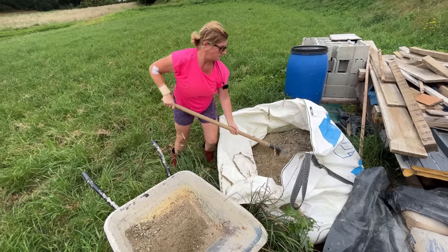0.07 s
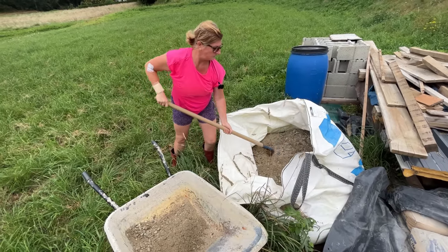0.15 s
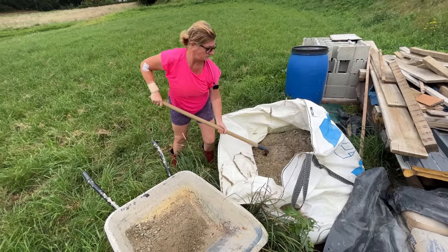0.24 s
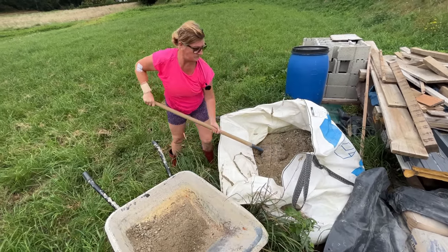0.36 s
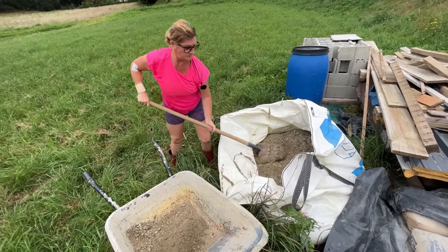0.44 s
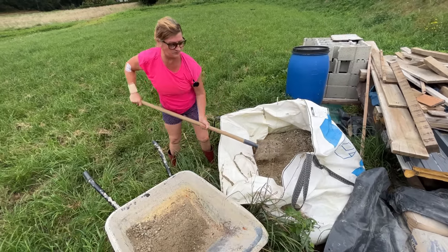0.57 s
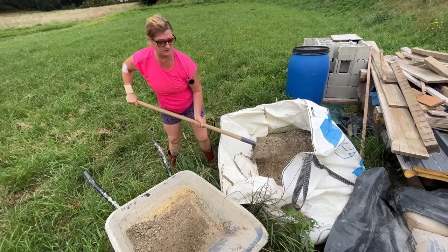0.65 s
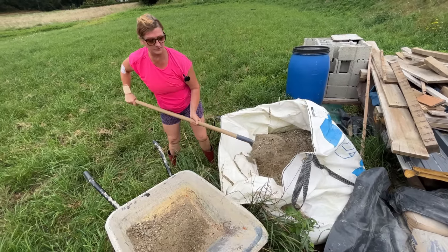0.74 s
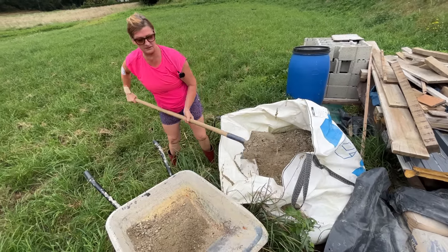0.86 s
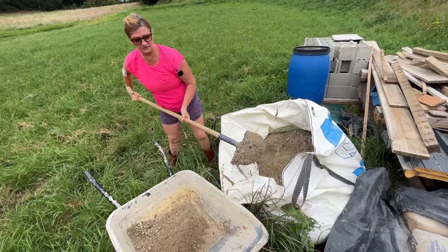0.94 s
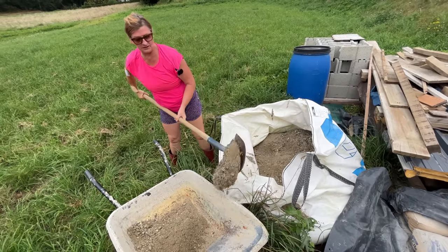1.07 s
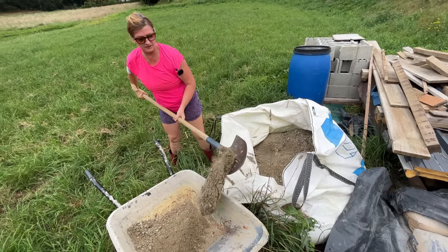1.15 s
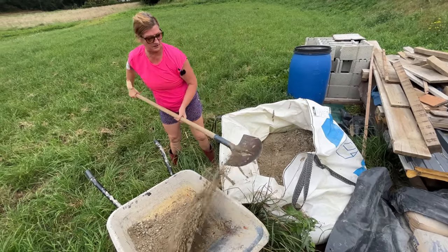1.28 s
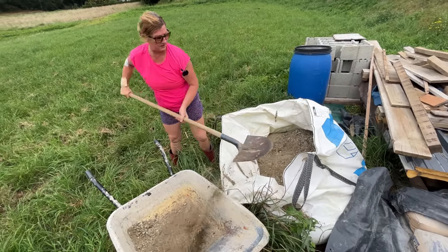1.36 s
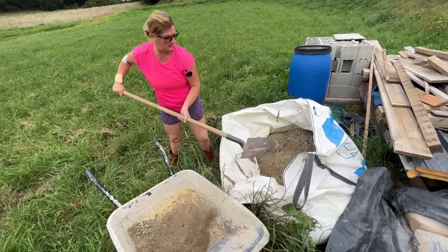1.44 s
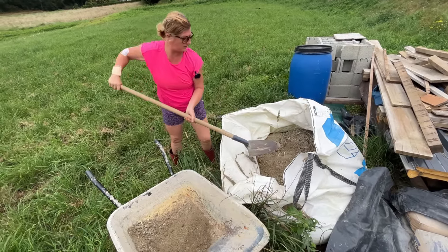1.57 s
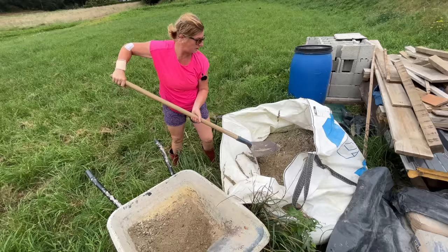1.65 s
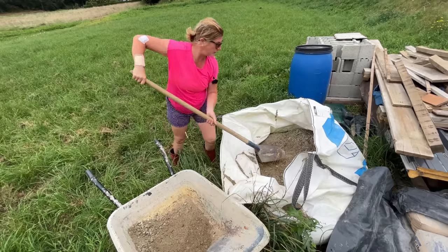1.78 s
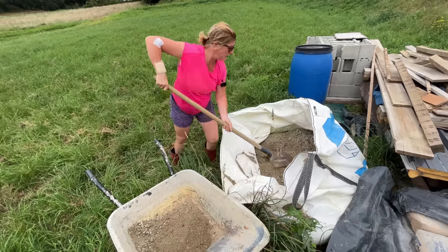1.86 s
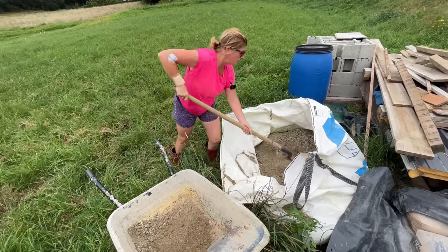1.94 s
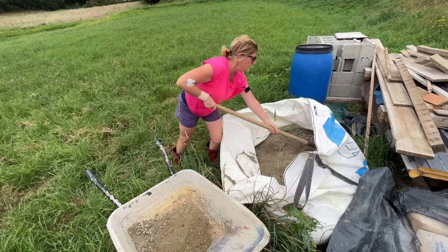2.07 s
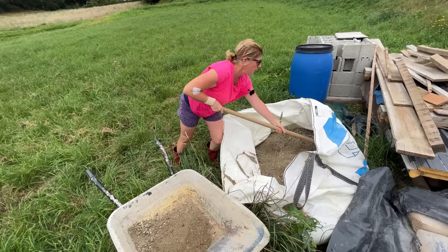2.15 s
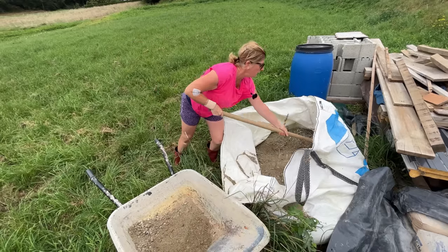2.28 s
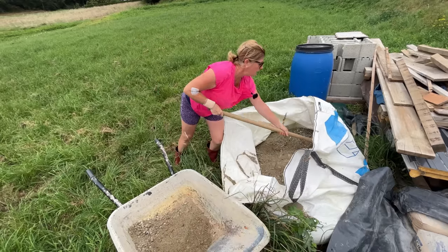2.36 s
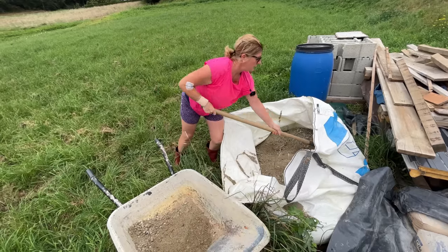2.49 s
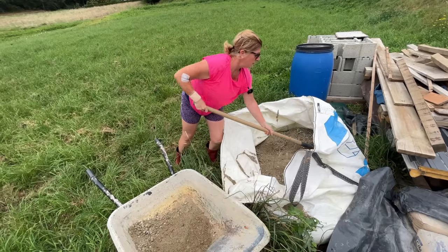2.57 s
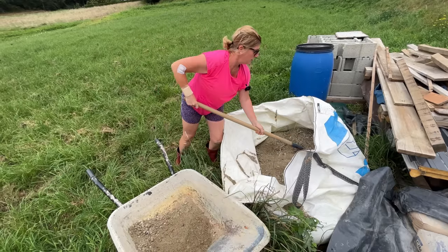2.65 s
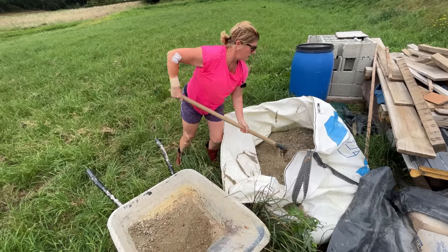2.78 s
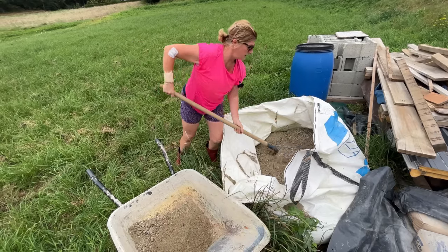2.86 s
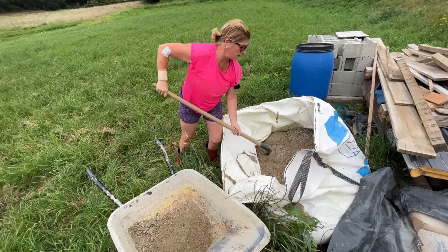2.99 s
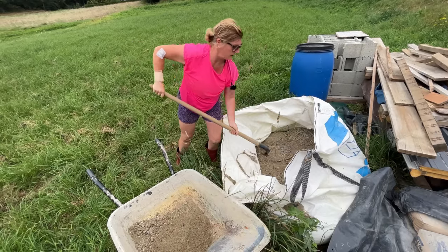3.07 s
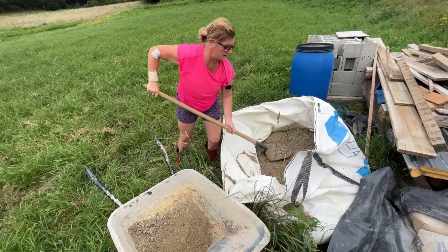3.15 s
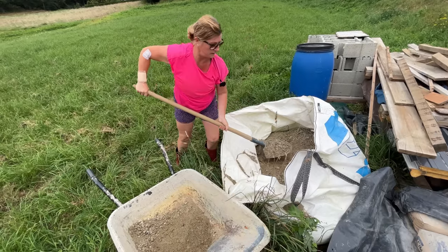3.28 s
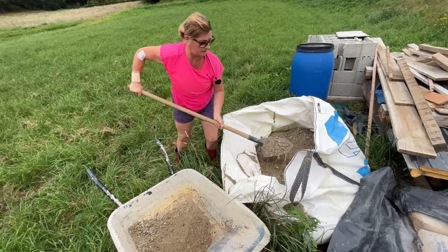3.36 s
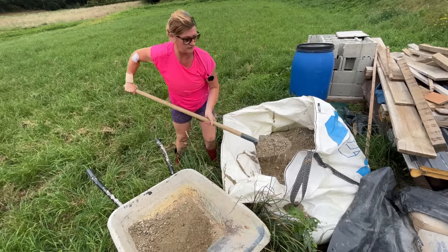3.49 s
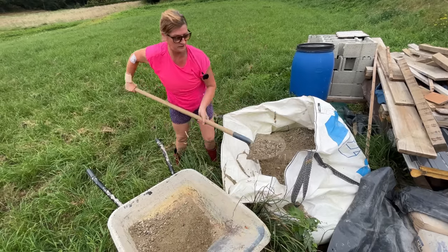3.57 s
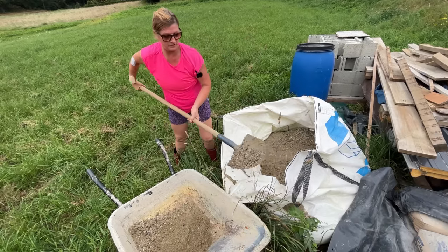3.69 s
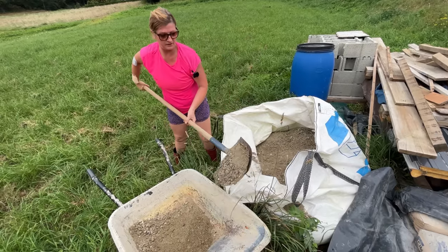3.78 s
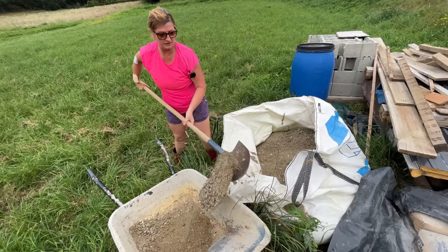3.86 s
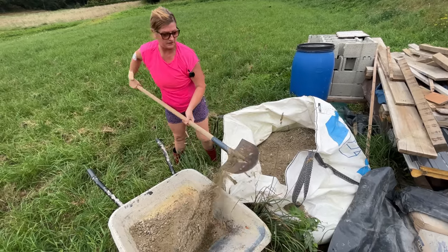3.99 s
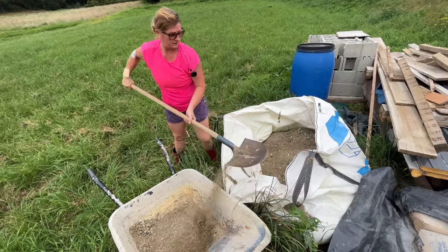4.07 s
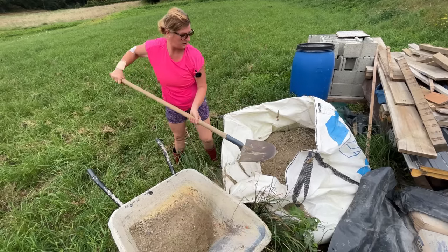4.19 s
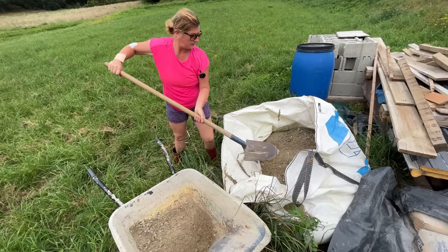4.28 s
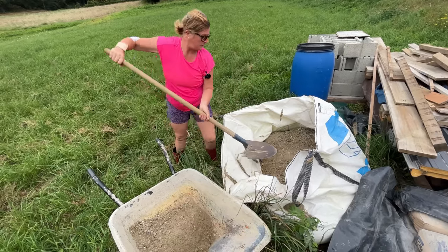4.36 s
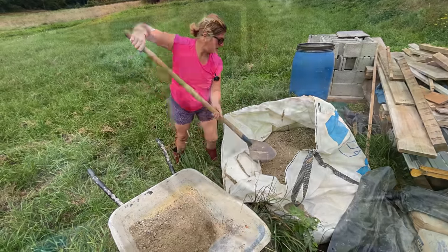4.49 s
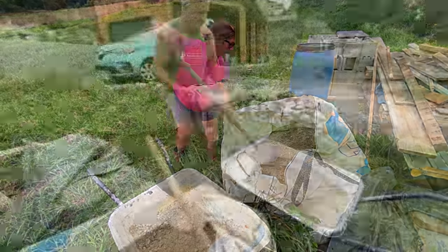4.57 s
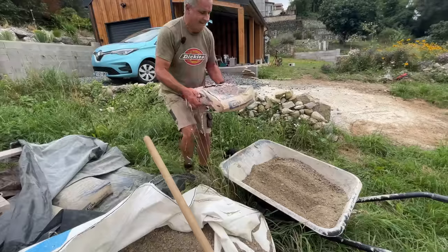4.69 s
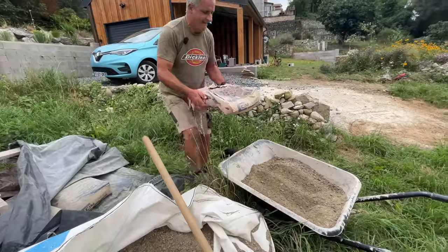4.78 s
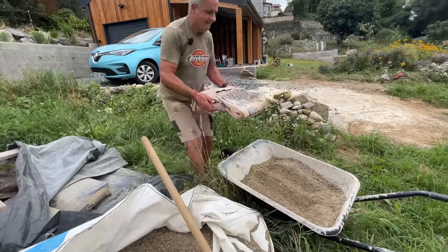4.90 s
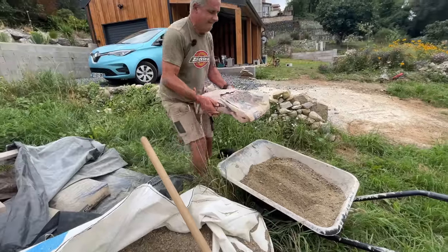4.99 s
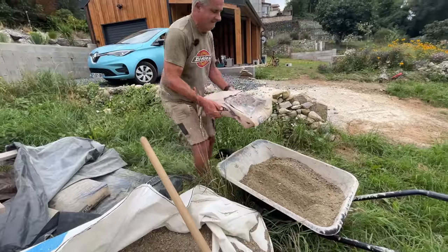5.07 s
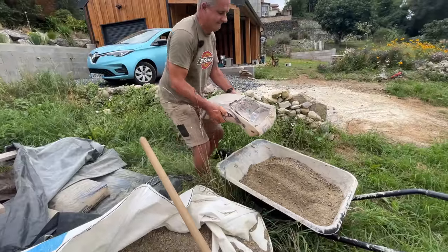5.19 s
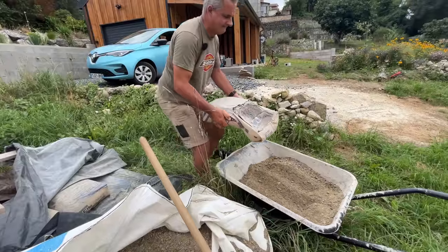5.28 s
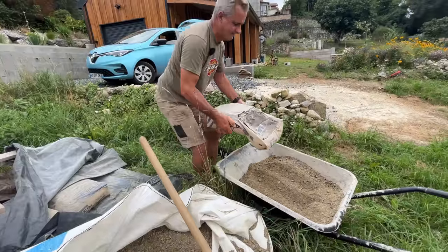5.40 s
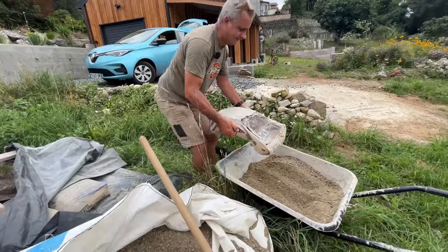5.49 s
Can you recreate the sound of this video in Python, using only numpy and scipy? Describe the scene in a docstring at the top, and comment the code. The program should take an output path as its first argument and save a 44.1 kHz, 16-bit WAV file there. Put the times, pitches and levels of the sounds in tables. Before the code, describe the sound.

A shovel works sand and gravel in an open field, heard through a wind-bumped clip-on microphone. Faint gritty sliding, a load dumped with pebbly knocks, a sharp ringing stab, digging, a short near-lull, another dump with steel clinks and a final stab. Then a soft papery rustle with small snaps in a quieter spot.

```python
"""Sand settles on a steel shovel blade, lifts and tips into a wheelbarrow: filtered noise, stone bursts, modal clinks.
The blade then stabs into sand and gravel, scoops, lifts, tips its load and stabs once more.
Throughout, wind buffets a clip-on microphone: two bands of lumpy noise and short tonal pops.
After the last stab a quieter spot follows, where a paper sack rustles: clumped noise and separate snaps."""
import sys
import numpy as np
from scipy import signal
from scipy.fft import rfft, irfft
from scipy.io import wavfile
from scipy.ndimage import uniform_filter1d

SR = 44100
rng = np.random.default_rng(int(sys.argv[2]) if len(sys.argv) > 2 else 0)


def int16_out(signal):
    """Quantize to a 16-bit WAV file."""
    q = np.round(np.clip(np.atleast_2d(signal).T, -1, 1) * 32767)
    wavfile.write(sys.argv[1], SR, q.astype(np.int16))


N = 244314

# wind on the microphone: (time [s], rumble level [dB], flutter level [dB])
WIND_LEVELS = [(0.0, -20, -37), (0.04, -40, -38.5), (0.28, -40.5, -53), (0.37, -36.5, -46.5),
               (0.48, -41.5, -53), (1.14, -38, -35), (1.48, -42, -37), (1.71, -32, -37), (1.8, -45, -42),
               (1.83, -35.5, -47), (1.9, -44, -49.5), (2.16, -40, -36.5), (2.55, -38, -44.5),
               (2.67, -50, -49.5), (2.75, -36.5, -32.5), (2.95, -43.5, -62.5), (3.01, -55, -59),
               (3.29, -45, -57.5), (3.42, -53, -60), (4.03, -41, -43), (4.57, -56, -49), (4.8, -57, -73),
               (4.91, -51.5, -63.5), (5.46, -58.5, -70.5), (5.51, -47, -75), (5.54, -70, -73)]
# relative spectra of the two wind bands: (frequency [Hz], density [dB per Hz])
RUMBLE_SPECTRUM = [(8.8, -52.5), (15, -22.5), (30, -5.5), (59, 10.5), (97, 4.5), (144, -13.5), (250, -36.5),
                   (320, -57.5), (550, -120)]
FLUTTER_SPECTRUM = [(70, -37.5), (130, -1.5), (200, -1), (300, -8), (500, -18), (900, -41)]
# single eddies that pop on the microphone: (time [s], level [dB], frequency [Hz])
EDDY_POPS = [(.009, -28, 83), (.042, -26.5, 170), (.066, -23, 116), (.195, -33, 90), (.381, -30, 97),
             (.56, -34, 53), (0.699, -30.5, 62.6), (.88, -30.5, 76), (1.02, -22, 201), (1.159, -31, 84),
             (1.5, -25, 190), (1.64, -31, 190), (1.83, -21, 99), (2.119, -21, 103), (2.181, -21, 171),
             (2.277, -28, 125), (2.336, -20, 137), (2.405, -27.5, 149), (2.47, -27.5, 121),
             (2.559, -26.5, 186), (2.705, -24.5, 110), (2.73, -24, 149), (2.755, -21.5, 120),
             (2.79, -19, 87), (2.889, -29.5, 85), (3.143, -35, 79), (3.203, -38, 73), (3.266, -35.5, 54),
             (3.327, -33.5, 70), (3.744, -32, 180), (3.988, -29, 83), (4.949, -43, 51), (5.009, -49, 61),
             (5.489, -44, 54.6)]
POP_CYCLES, POP_SKEW = 1.76, 0.68  # length in cycles; below 1, a pop starts quicker than it ends
POP_OVERTONE = 0.23  # amplitude of each overtone as a share of the one below

# sand moving on the blade, one list per movement (settling, lift, pour, scoop, lift, pour):
# (time [s], flow level [dB], coarseness [dB])
SAND_MOVEMENTS = [
    [(0, -52.5, -7), (.09, -47.5, -0.5), (.21, -49.5, -1), (.285, -55, -2.5), (.365, -68, -6),
     (.43, -69, -4), (.5, -77, 1), (.566, -76, 0)],
    [(.57, -52.5, -0.5), (.62, -50.5, -5), (.764, -43.5, 5), (.856, -46, 4), (.924, -40.5, 2.5),
     (1.008, -46.5, -5)],
    [(1.008, -44, 2.5), (1.115, -34, -4), (1.147, -35, 10), (1.205, -47, -2), (1.235, -41, 13),
     (1.29, -42, 4), (1.355, -37.5, -5.5), (1.47, -32, 8.5), (1.527, -40, 0.5), (1.61, -35.5, 6),
     (1.718, -47.5, -4), (1.826, -54, 1.5), (1.862, -44, -2)],
    [(2.38, -71, 2), (2.42, -56, 0), (2.452, -49.5, 2), (2.528, -42, -1), (2.608, -46.5, -3),
     (2.82, -38.5, -1.5), (2.963, -42, -5), (3.07, -55, 4.5), (3.107, -64, 2), (3.24, -78.5, 2),
     (3.368, -89.5, -3)],
    [(3.375, -62, 7), (3.406, -54, -13), (3.462, -44.5, -1.5), (3.626, -48.5, -4.5), (3.682, -45, 1),
     (3.718, -50.5, -10.5)],
    [(3.718, -49.5, 0), (3.761, -44.5, 1.5), (3.817, -41, 7), (3.877, -38.5, 5.5), (3.925, -45, 1),
     (3.993, -35.5, -9), (4.045, -35, -2), (4.081, -38.5, 2), (4.216, -39.5, -5.5), (4.26, -43, -2),
     (4.304, -39.5, 1), (4.372, -40.5, 2.5), (4.544, -54, 0), (4.608, -54, -4)],
]
# share of fine dust in each movement [dB]: scoops dig damp sand, pours throw up dry dust
MOVEMENT_FINES_DB = [-2.5, 0, 1, -3.5, -1, 2.5]
# relative spectrum of sliding sand: (frequency [Hz], density [dB per Hz])
SAND_SPECTRUM = [(150, -32.5), (290, -13.5), (560, -1), (760, -7), (1280, -6), (1700, -8.5), (1960, -7),
                 (2450, -10), (2900, -8.5), (5030, -6), (7000, -10), (9450, -13.5), (10100, -17),
                 (16200, -24)]
# modes of the bare steel blade: (frequency [Hz], level [dB], t60 [s])
BLADE_MODES = [(1155, 0, 0.02), (1350, -2, 0.21), (1870, -7.5, 0.078), (2890, -3.5, 0.085),
               (3160, -6.5, 0.38), (4140, -13, 0.24), (4370, -31.5, 0.031), (4500, -16, 0.32),
               (5020, -10.5, 0.27), (5270, -11.5, 0.36), (5830, -16.5, 0.16), (6100, -9.5, 0.092),
               (6730, -10, 0.037), (7240, -13, 0.26), (7710, -4.5, 0.056), (8530, -4.5, 0.054),
               (8230, -7.5, 0.037), (9220, -5.5, 0.036), (9630, -14.5, 0.03), (10530, -17, 0.074),
               (11100, -18, 0.076), (11430, -28.5, 0.017), (12200, -21.5, 0.033), (11800, -25.5, 0.016),
               (14340, -27.5, 0.028), (14900, -23, 0.048)]
# stabs into the heap: (time [s], level [dB], push [s], change over the push [dB], stop [s], coarseness [dB])
BLADE_STABS = [(1.862, -25, .17, -2.5, 0.38, -2), (4.606, -30, 0.086, -8, 0.069, -8)]
STAB_RISE_S, BITE_DB, BITE_S = 0.0067, 3.5, 0.028  # rise; extra level of the bite and its decay constant
STOP_DB = -37  # further change over each stop time
DIG_DB_PER_S = 19  # the sand gets coarser as the blade digs deeper
STAB_FINES_DB, DAMP_DB_PER_S = 1.5, -22.5  # the hiss fades as the blade reaches damp sand
STILL_DB = -80  # level between the movements
# quicker sand is finer: crunch and hiss against the grit at MIDDLE_DB, slopes in dB per dB of flow
MIDDLE_DB, CRUNCH_DB, CRUNCH_SLOPE = -43.5, -6, -0.41
HISS_DB, HISS_SLOPE, HISS_FLOOR_DB = -5.5, 0.26, -74.5
HISS_PER_COARSE = -0.4  # coarse sand crunches more and hisses less

# relative spectrum of the open field's hiss: (frequency [Hz], density [dB per Hz])
AIR_SPECTRUM = [(150, -50.5), (250, 1.5), (484, 5), (674, 5), (1450, -26.5), (2160, -9), (6250, -13),
                (8120, -38), (16000, -25)]
AIR_DB = -79.5

# stones that land on heap, bag or tub: (time [s], level [dB], thud [dB], sizzle [dB], body t60 [s])
STONE_HITS = [(.2053, -46, -11, 14.5, .016), (.4203, -53, -11.5, -24, 0.051), (.44, -52, -5, 0, .03),
              (.572, -48, -8, -7, 0.023), (1.2095, -22, -18, -5, 0.069), (1.2391, -13, -2, -9.5, 0.064),
              (1.2826, -41, 6, 14, 0.059), (1.3232, -21.5, -29, 21, 0.0072), (1.4705, -15.5, -12, 1, 0.053),
              (1.4918, -17.5, -4, -6.5, 0.048), (1.5718, -27, -7.5, -4.5, 0.043),
              (1.737, -39.5, -16, 9, .023), (1.8614, -26.5, -33, 12.5, .1), (2.3328, -61, 11, -8, .045),
              (2.474, -52, 15, -8, 0.036), (2.758, -50, 14, -8, 0.033), (2.7896, -32, -1.5, 4, 0.021),
              (3.107, -55, -3, 16, 0.013), (3.1876, -47.5, -12, -15, 0.019), (3.2135, -56, -8, 5.5, .024),
              (3.3199, -62, -17, 21, 0.022), (3.3544, -50, -9, -24, .024), (3.3739, -39, -25, -21, 0.01),
              (3.3873, -51, 4, -9, 0.034), (3.4024, -46, 0, -18, 0.013), (3.4163, -44.5, -18, 11, .017),
              (3.5082, -46.5, 13.5, -6, 0.012), (3.6349, -46, 11, 13, 0.04), (3.7591, -39, 11.5, -7, 0.019),
              (3.7811, -39.5, 7, -10, 0.054), (3.9365, -36, -6, 4, 0.035), (3.9852, -40.5, -3, -8, 0.089),
              (4.0385, -18.5, -8, 1.5, 0.074), (4.103, -24.5, -17, -4.5, .05), (4.127, -27, -8, 2, 0.034),
              (4.1483, -30.5, -5, 9.5, 0.098), (4.1939, -38, 0, 18.5, 0.06), (4.213, -32, -5, -4, .054),
              (4.2873, -36, -1, 0, 0.064), (4.4147, -34.5, -2, 7, 0.025), (4.6079, -23.5, -35, -25, 0.054)]
STONE_RISE_S = 0.00065
STONE_HZ, DB_PER_OCTAVE = 3500, 12.5  # the more thud over sizzle, the lower the pitch
# single grains that trickle off the lifted blade: (start [s], end [s], level [dB])
GRAIN_TRICKLES = [(0.329, 0.547, -57), (3.136, 3.4, -58.5)]
# one grain: (central thud [dB], sizzle [dB], body t60 [s])
GRAIN_BURST = (-8, 0, .016)
GRAIN_SPREAD_DB = 2.5
# soft clods of sand: (time [s], level [dB])
CLOD_HITS = [(0.9297, -28), (1.0797, -47), (1.1013, -25), (1.1436, -34), (1.3873, -30.5), (1.428, -24.5),
             (1.459, -43), (1.4774, -22), (1.5074, -35), (3.0596, -45.5), (3.4318, -61), (3.6715, -39),
             (3.8442, -30), (3.8791, -36.5), (4.374, -29)]
# one clod: (thud [dB], sizzle [dB], body t60 [s], pitch [Hz], rise constant [s])
CLOD_BURST = (-3, -5, .045, 6500, .003)
# resonances of the barrow tub: (frequency [Hz], width before added damping [Hz], level [dB])
TUB_MODES = [(504, 13, 1.5), (720, 28, 5), (1234, 58, 4), (1370, 16, -3), (1944, 91, -1), (2220, 36, -8)]

# blows on the blade: (time [s], level [dB], tilt [dB per octave], ring length [share of bare t60])
BLADE_BLOWS = [(1.101, -19.5, 9, 0.98), (1.4696, -28, 9, 0.55), (1.8622, -0.5, 11, 0.26),
               (3.935, -32, 3, .8), (3.9524, -28, 13, .8), (3.985, -15.5, 10, 1), (3.998, -17, 17, 1),
               (4.0378, -12.5, 5.5, 0.84), (4.6078, -7, 11, 0.38)]

# rustle of the paper sack: (time [s], level [dB])
RUSTLE_LEVELS = [(4.76, -55.5), (4.844, -56.5), (4.874, -51.5), (4.942, -52), (5.002, -65), (5.064, -57),
                 (5.154, -62), (5.222, -58), (5.508, -57.5), (5.516, -59.5), (5.54, -59)]
# relative spectrum of the rustle before the glide: (frequency [Hz], density [dB per Hz])
SACK_SPECTRUM = [(88, -52), (150, -36), (265, -22), (304, 11), (369, -21), (536, 0), (910, -11),
                 (984, -4.5), (1670, -7), (2470, -9.5), (2890, -25), (3660, -10.5), (6200, -17),
                 (10100, -11.5), (16200, -19)]
# snaps of the paper sack: (time [s], level [dB], thud [dB], pitch [Hz])
SACK_SNAPS = [(4.8777, -43.5, 2, 1700), (4.9094, -55, -10, 1520), (5.0604, -54.5, 1, 1250),
              (5.0892, -56, 1, 1500), (5.1694, -59.5, 3.5, 1310), (5.3, -49.5, 3.5, 4000),
              (5.3837, -57, 9.5, 1080), (5.4294, -55, 6, 1500), (5.4497, -52.5, 7, 1160),
              (5.5014, -54, 8, 1640), (5.53, -55, 6, 800)]
# one snap: (sizzle [dB], body t60 [s], rise constant [s])
SNAP_BURST = (-10, .024, .0008)
# from GLIDE_S on, the peaks and notches of the rustle glide down and the lows rise
GLIDE_S, SLIDE_PER_S, RUSTLE_LOW_DB, LOW_GAIN_DB_PER_S = 5.2, 0.48, -3.5, 19

BAND_LIMIT_HZ = 15740


def amp(db):
    """Decibel law: 20 dB is a tenfold amplitude."""
    return 10 ** (np.asarray(db) / 20)


def evened(x):
    """Normalization to unit rms."""
    return x / np.sqrt(np.mean(x ** 2) + 1e-20)


def read(points, hz):
    """Linear interpolation of a spectrum on a log-frequency axis."""
    f, value = np.transpose(points)
    return np.interp(np.log(hz + 1), np.log(f + 1), value)


def columns(rows, t):
    """Linear interpolation of each value column over time."""
    s, *values = np.transpose(rows)
    return [np.interp(t, s, v) for v in values]


def coloured(x, db_of):
    """Fixed linear filtering: the spectrum is multiplied by a gain given as dB over Hz."""
    gain = amp(db_of(np.fft.rfftfreq(len(x), 1 / SR)))
    return irfft(rfft(x) * gain, len(x))


def wander(hz):
    """Low-pass filtered white noise: a slow random curve of rms 1."""
    return evened(signal.lfilter(*signal.butter(2, hz, fs=SR), rng.standard_normal(N)))


def wind():
    """Turbulent pressure: eddies press in lumps as a deep rumble, a gusty flutter and single pops."""
    rumble_db, flutter_db = columns(WIND_LEVELS, np.arange(N) / SR)
    lumps = wander(21.7)
    deep, quick = rng.standard_normal((2, N))
    deep = coloured(deep, lambda hz: read(RUMBLE_SPECTRUM, hz))
    quick = coloured(quick, lambda hz: read(FLUTTER_SPECTRUM, hz))
    rumble = evened(amp(2.0 * lumps + 1.5 * wander(5)) * deep)
    flutter = evened(amp(3.0 * lumps + 2.4 * wander(17) + 1.4 * wander(45)) * quick)
    out = amp(rumble_db) * rumble + amp(flutter_db) * flutter
    t = np.arange(6000) / SR
    for (s, db, hz), turn in zip(EDDY_POPS, rng.random(len(EDDY_POPS))):
        hump = np.sin(np.pi * np.minimum(t * hz / POP_CYCLES, 1) ** POP_SKEW) ** 2
        tone = sum(POP_OVERTONE ** k * np.sin(2 * np.pi * ((k + 1) * hz * t + turn)) for k in range(4))
        part = out[round(s * SR):][:6000]  # a view: adding to it adds to out
        part += (amp(db) * hump * tone)[:len(part)]
    return out


def ramp(hz, lo_hz, hi_hz):
    """Sine-squared crossover: rises smoothly from 0 to 1 between two frequencies."""
    position = np.log((hz + 1) / lo_hz) / np.log(hi_hz / lo_hz)
    return np.sin(np.pi / 2 * np.clip(position, 0, 1)) ** 2


def impacts(per_s, spread_db):
    """Poisson-like arrival: random sparse impacts whose levels spread exponentially."""
    return amp(spread_db * np.minimum(rng.exponential(1, N), 3)) * (rng.random(N) < per_s / SR)


def grains(per_s, spread_db, smear_s, clump_db, clump_hz):
    """Granular noise: dense hiss of tiny impacts, with larger grains as short bursts, all in clumps."""
    sizes = impacts(per_s, spread_db)
    power = signal.lfilter([1], [1, -np.exp(-1 / (smear_s * SR))], sizes ** 2)
    return evened(np.sqrt(1 + power) * amp(clump_db * wander(clump_hz)) * rng.standard_normal(N))


def pebbles():
    """Damped oscillation: small pebbles in the sand click with a few cycles at their own pitch."""
    t, out = np.arange(512) / SR, np.zeros(N)
    for hz in np.geomspace(2200, 10000, num=24):
        sizes = impacts(per_s=12, spread_db=2.4)
        click = np.sin(2 * np.pi * hz * t) * t * hz * np.exp(-t * hz / 4.2)
        out += signal.oaconvolve(sizes, click)[:N]
    return evened(out)


def blade(hz, damping_hz):
    """Modal resonance of the steel: sand lying on it widens every mode."""
    response = 0
    for mode_hz, db, t60 in BLADE_MODES:
        width_hz = np.log(1000) / np.pi / t60 + damping_hz
        response = response + amp(db) / (1 + 2j * (hz - mode_hz) / width_hz)
    return response


def flow():
    """Addition of powers: level, coarseness and dust of the movements, and of stabs that bite, push and stop."""
    t = np.arange(N) / SR
    power, kind_db = amp(STILL_DB) ** 2, 0  # kind_db holds coarseness and fines
    for rows, fines_db in zip(SAND_MOVEMENTS, MOVEMENT_FINES_DB):
        db, grain_db = columns(rows, t)
        on = (t >= rows[0][0]) * (t < rows[-1][0])
        power = power + amp(db) ** 2 * on
        kind_db = kind_db + np.array([grain_db, fines_db + 0 * t]) * on
    for s, db, push, push_db, stop, grain_db in BLADE_STABS:
        u = np.maximum(t - s, 0)
        shape_db = BITE_DB * np.exp(-u / BITE_S) + push_db * np.minimum(u / push, 1)
        shape_db = shape_db + STOP_DB * np.maximum(u - push, 0) / stop
        stab = amp(db + shape_db) ** 2 * np.minimum(u / STAB_RISE_S, 1) ** 2
        depth = np.minimum(u, push + stop)  # counted as digging time in s
        dug_db = np.array([grain_db + DIG_DB_PER_S * depth, STAB_FINES_DB + DAMP_DB_PER_S * depth])
        kind_db = (power * kind_db + stab * dug_db) / (power + stab)  # mean weighted by power
        power = power + stab
    return 10 * np.log10(power), *kind_db


def sand():
    """Granular friction exciting modes: grains slide over steel, coarse ones crunch and fine ones hiss."""
    stream = grains(per_s=250, spread_db=-1.5, smear_s=0.0091, clump_db=-0.84, clump_hz=60)
    stream = stream + amp(-14.5) * pebbles()
    hz = np.fft.rfftfreq(N, 1 / SR)
    steel = rfft(stream) * amp(read(SAND_SPECTRUM, hz)) * (1 + amp(5.0) * blade(hz, damping_hz=69.7))
    low, high = 1 - ramp(hz, 1100, 3900), ramp(hz, 6400, 12000)
    grit_db, coarse_db, fines_db = flow()
    quick_db = grit_db - MIDDLE_DB
    crunch_db = grit_db + np.minimum(CRUNCH_DB + CRUNCH_SLOPE * quick_db, -1) + coarse_db
    hiss_db = grit_db + HISS_DB + HISS_SLOPE * quick_db + HISS_PER_COARSE * coarse_db + fines_db
    hiss_db = np.maximum(hiss_db, HISS_FLOOR_DB)
    bands = [(grit_db, 1 - low - high), (crunch_db, low), (hiss_db, high)]
    return sum(amp(db) * evened(irfft(steel * share, N)) for db, share in bands)


def air():
    """Stationary noise: the faint steady hiss of the open field."""
    return amp(AIR_DB) * evened(coloured(rng.standard_normal(N), lambda hz: read(AIR_SPECTRUM, hz)))


def knocks(rows):
    """Frequency-dependent decay: in each rough noise burst the sizzle dies first and the thud outlasts the body."""
    out, t = np.zeros(N + 4096), np.arange(4096) / SR
    bins_hz = np.fft.rfftfreq(4096, 1 / SR)
    tub = sum(amp(db) / (1 + 2j * (bins_hz - hz) / (width + 130)) for hz, width, db in TUB_MODES)
    noises = rng.standard_normal((len(rows), 2, 4096))
    for (s, db, thud_db, sizzle_db, t60, hz, rise), (noise, rough_noise) in zip(rows, noises):
        edges = [(1600, 8500), (7000, 15000), (hz * 0.71, hz * 1.27)]
        bands = [signal.lfilter(*signal.butter(2, e, "band", fs=SR), noise) for e in edges]
        wide, sizzle, ping = (evened(band) for band in bands)
        thud = evened(irfft(rfft(noise) * tub / (1 + (bins_hz / 2600) ** 4)))
        fall_db = -60 * t / max(t60, .004)
        body = wide + .55 * ping
        burst = amp(thud_db + 0.8 * fall_db) * thud + amp(fall_db) * body
        burst = burst + amp(sizzle_db + 3.0 * fall_db) * sizzle
        # random level modulation roughens each burst and sharpens its peaks
        roughness = amp(1.4 * evened(uniform_filter1d(rough_noise, size=30)))
        at = round(s * SR)
        out[at:at + 4096] += amp(db) * burst * roughness * (1 - np.exp(-t / max(rise, .0001)))
    return out[:N]


def stones():
    """Impact excitation: sharp stones, soft clods and stray grains, each a decaying noise burst."""
    rows = list(STONE_HITS)
    for start, end, db in GRAIN_TRICKLES:
        for at, size, tone in rng.random((8, 3)):
            level_db = db - GRAIN_SPREAD_DB * np.log(size + .05)
            thud_db = GRAIN_BURST[0] + 12 * (tone - .5)
            rows.append((start + at * (end - start), level_db, thud_db, *GRAIN_BURST[1:]))
    sharp = []
    for row in rows:
        pitch_hz = STONE_HZ * 2 ** ((row[3] - row[2]) / DB_PER_OCTAVE)
        sharp.append((*row, np.clip(pitch_hz, 1500, 9500), STONE_RISE_S))
    return knocks(sharp + [(*row, *CLOD_BURST) for row in CLOD_HITS])


def clinks():
    """Modal synthesis: each blow excites the modes with slightly random levels and phases; sand shortens the ring."""
    out, t = np.zeros(N + 8192), np.arange(8192) / SR
    hz, mode_db, t60 = np.transpose(BLADE_MODES)[:, :, None]
    draws = rng.standard_normal((len(BLADE_BLOWS), 2, len(BLADE_MODES), 1))
    for (s, db, tilt_db, share), (level_draw, turn) in zip(BLADE_BLOWS, draws):
        level_db = mode_db + tilt_db * np.log2(hz / 6000) + 1.1 * level_draw - 60 * t / (t60 * share)
        ring = (amp(level_db) * np.sin(2 * np.pi * (hz * t + turn))).sum(0)
        at = round(s * SR)
        out[at:at + 8192] += amp(db) * ring / abs(ring).max() * (1 - np.exp(-t / 0.00017))
    return out[:N]


def reshaped(x, db_of):
    """Time-varying filtering in the short-time spectrum, by a gain given as dB over Hz and s."""
    hz, t, z = signal.stft(x, SR, nperseg=256, noverlap=192)
    return signal.istft(z * amp(db_of(hz[:, None], t)), SR, nperseg=256, noverlap=192)[1][:N]


def sack():
    """Crackling noise under a gliding spectrum: paper rustles and snaps, and late on its colour slides down."""
    def colour(hz, s):
        """Scaling of the frequency axis, with a changing level of the lows."""
        glided = np.maximum(s - GLIDE_S, 0)
        low_db = RUSTLE_LOW_DB + LOW_GAIN_DB_PER_S * glided
        slid_db = read(SACK_SPECTRUM, hz / (1 - SLIDE_PER_S * glided))
        return slid_db + low_db * (1 - ramp(hz, 2600, 3800))

    crackle = grains(per_s=130, spread_db=1.0, smear_s=0.00082, clump_db=-0.5, clump_hz=30)
    stream = evened(reshaped(crackle, colour))
    sizzle_db, t60, rise = SNAP_BURST
    snaps = knocks([(s, db, thud_db, sizzle_db, t60, hz, rise) for s, db, thud_db, hz in SACK_SNAPS])
    return amp(columns(RUSTLE_LEVELS, np.arange(N) / SR)[0]) * stream + snaps


def scene():
    """Superposition: the field by the bag gives way to the quieter spot; one microphone feeds both channels."""
    t = np.arange(N) / SR
    field = np.clip((4.78 - t) / 0.049, 0, 1)
    quiet_spot = np.clip((t - 4.55) / 0.14, 0, 1)
    mix = field * (sand() + air()) + stones() + clinks() + quiet_spot * sack() + wind()
    return np.array([mix, mix])


def record(dry):
    """Band limitation: a symmetric low-pass filter removes the highest treble."""
    lowpass = signal.firwin(1023, BAND_LIMIT_HZ, window=("kaiser", 9), fs=SR)
    return signal.oaconvolve(dry, lowpass[None], "same")


dry = scene()
out = record(dry)
int16_out(out)
```